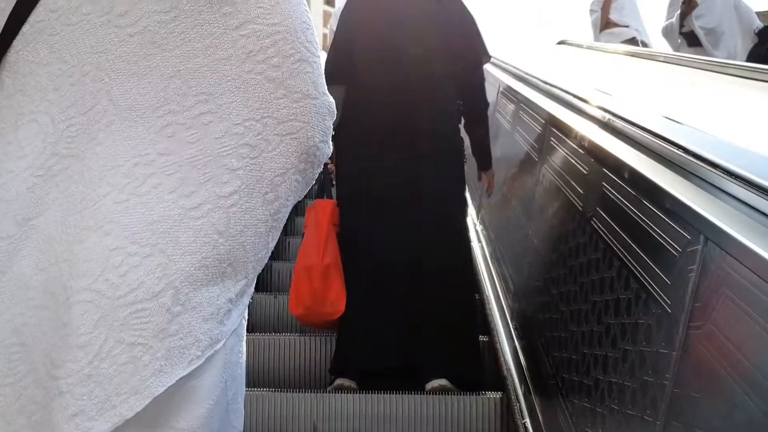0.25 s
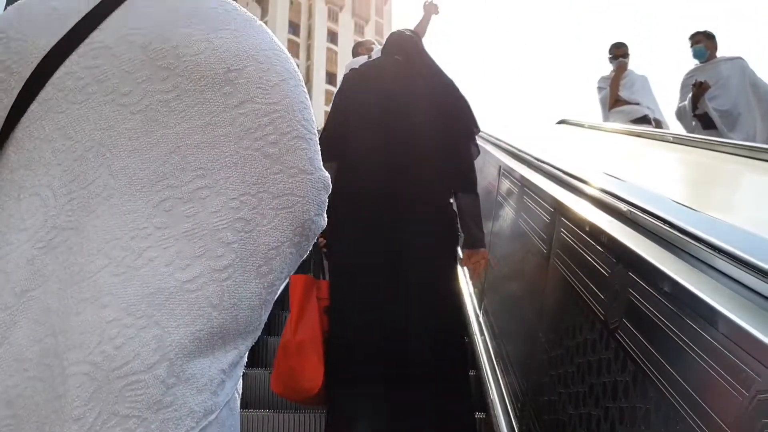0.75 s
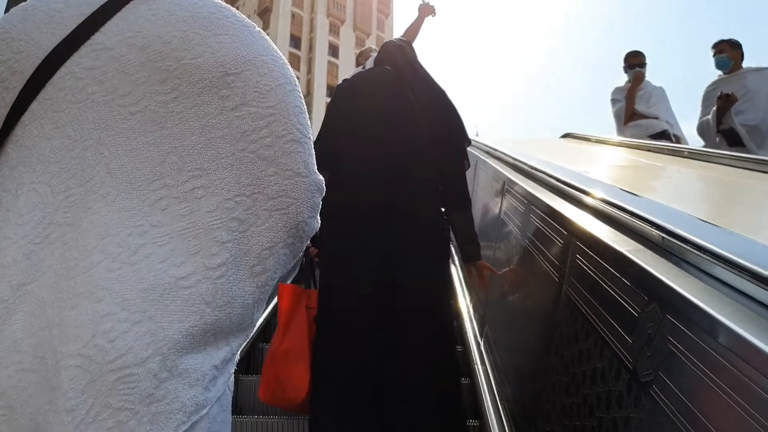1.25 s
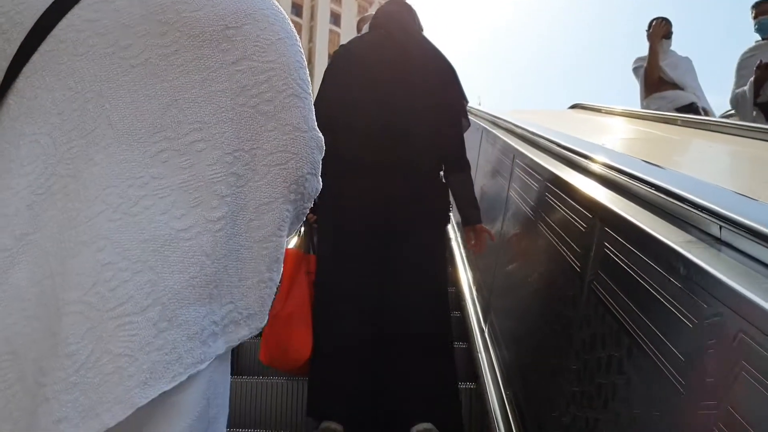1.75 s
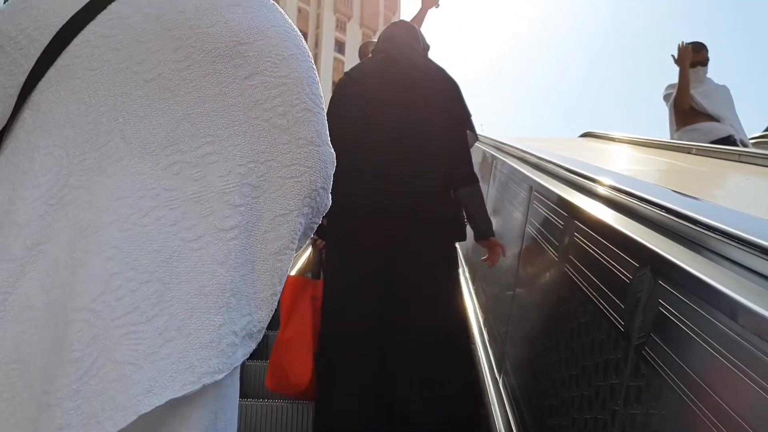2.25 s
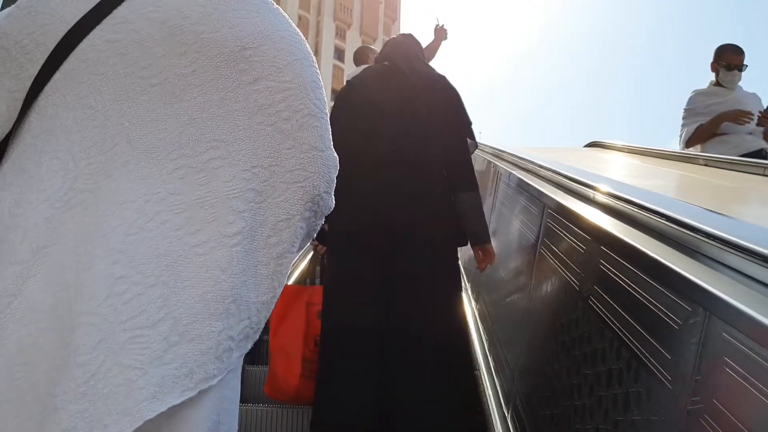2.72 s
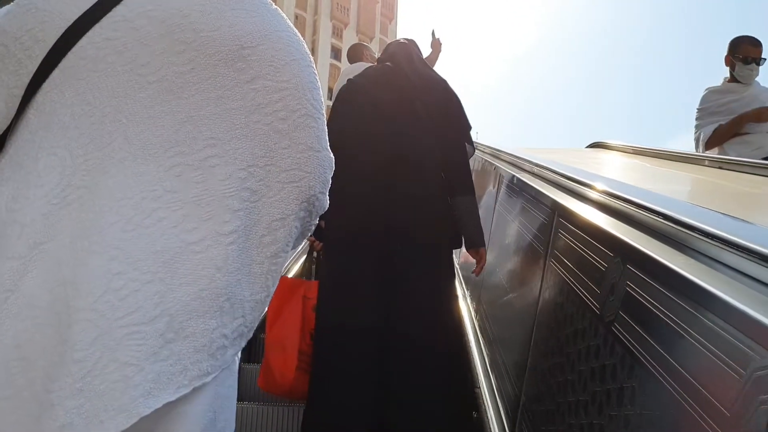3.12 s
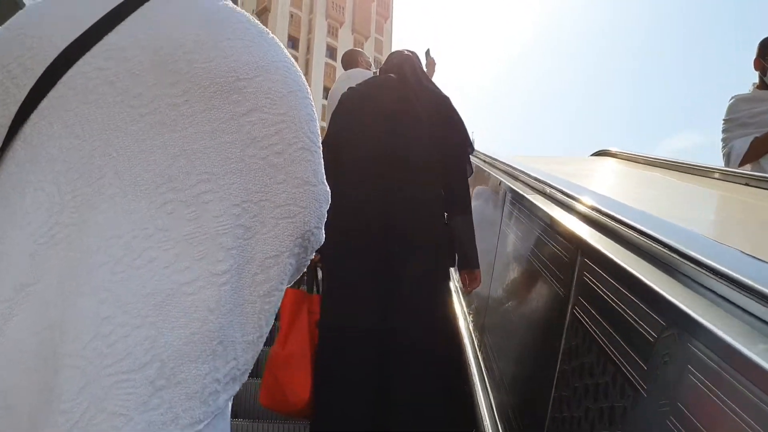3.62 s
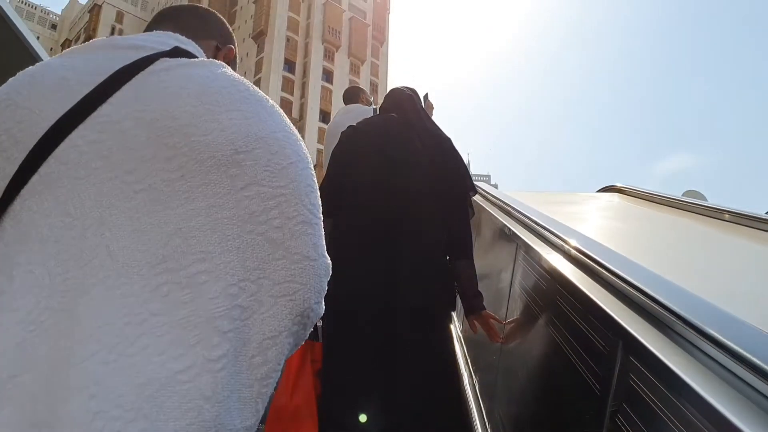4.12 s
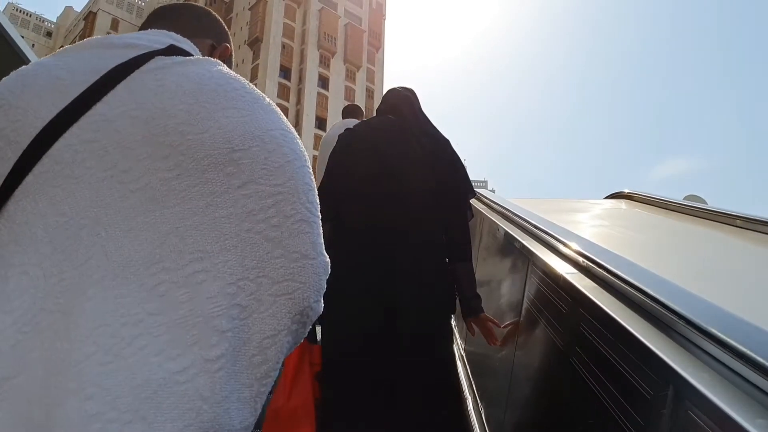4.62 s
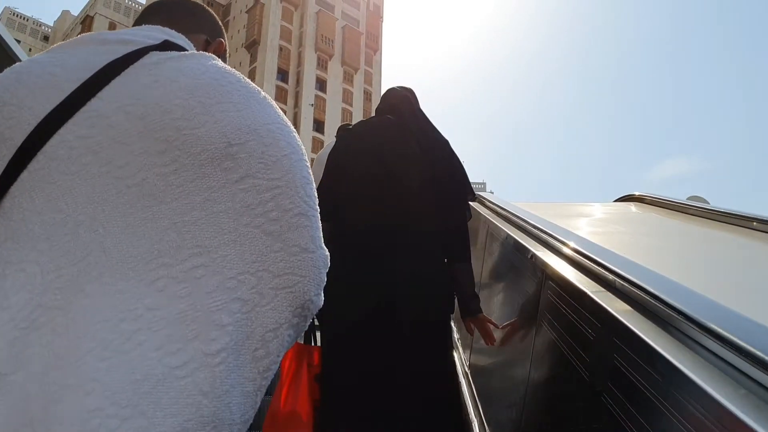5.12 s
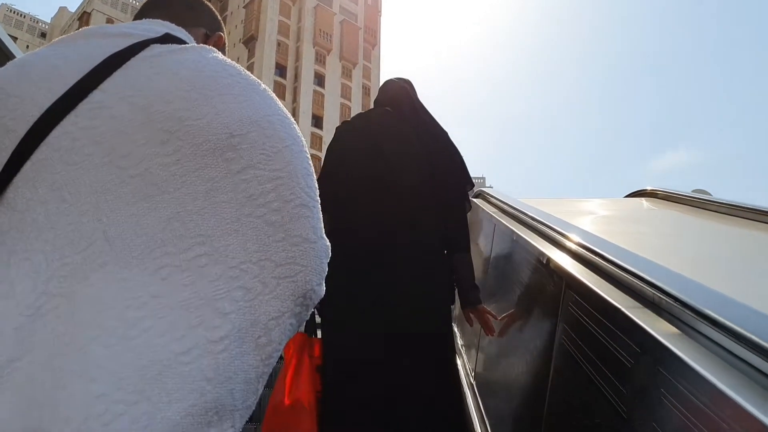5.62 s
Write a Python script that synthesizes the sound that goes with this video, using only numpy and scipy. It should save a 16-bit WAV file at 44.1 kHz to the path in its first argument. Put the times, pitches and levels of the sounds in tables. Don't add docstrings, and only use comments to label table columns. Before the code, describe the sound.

Riding an outdoor escalator: steady, bass-heavy roller rumble with narrow metallic hum, faint drive whine and brushing hiss. A low engine drone swells until about two seconds, then thins. A sharp click lands past the middle, followed by thin fluttering brake squeals on the right. Hand-held stereo microphone, wide and diffuse.

```python
import sys
import numpy as np
from scipy import signal
from scipy.fft import rfft, irfft
from scipy.io import wavfile
from scipy.ndimage import uniform_filter1d

SR = 44100
rng = np.random.default_rng(int(sys.argv[2]) if len(sys.argv) > 2 else 0)


def log_audio(samples):
    frames = np.atleast_2d(samples).T
    limited = np.clip(frames, -1, 1)
    pcm = np.round(limited * 32767).astype(np.int16)
    wavfile.write(sys.argv[1], SR, pcm)


def undo_db(level):
    steps = np.asarray(level, float) / 20
    return 10 ** steps


N = 258426
TIME = np.arange(N) / SR

PORT_GAP_M, SOUND_M_S = 0.18, 343
# frequency in Hz, left minus right port in dB.
BODY_SHADE = [(60, -1), (200, 0), (380, -2.5), (700, -0.5), (1290, -2.5), (2400, -6), (3600, -8),
              (5000, -7.5), (6800, -21.5), (9000, -6.5), (13000, -11)]
# frequency in Hz, density in dB per Hz.
ROLLING_COLOUR = [(20, -5.5), (32, -4.5), (90, -1), (145, -10), (300, -11.5), (500, -15.5), (950, -24),
                  (2000, -27.5), (3200, -33), (4600, -40.5), (7300, -41), (8400, -51), (11000, -44.5),
                  (15400, -48)]
# frequency in
# Hz, width in Hz, level over the colour in dB.
HUMPS = [(766, 220, 3), (1275, 240, 1.5), (1650, 100, -0.5), (2146, 110, 2), (2780, 560, 2)]
# time in seconds, level in dB.
RIDE = [(0, 4), (.33, 2.5), (.35, 0.5), (1.1, 1), (1.5, 0), (1.9, 1), (2.28, 0), (2.33, -2.5), (2.7, -3),
        (3.1, -2), (4.3, 0.5), (5.3, 1), (5.86, 1.5)]
TRUSS_SHARE, ROLLING_SHARE, SCRAPING_SHARE, HISS_SHARE = 0.16, 0.91, 1, 0.25
# middle in seconds, length in seconds, rise in dB.
BRUSHING = [
    (.15, .4, -1),
    (1.2, 1, 8),
    (2.9, 1.0, 4),
    (4.5, 0.58, 3.5),
    (5.1, 0.85, 7.5),
    (5.8, .6, 5),
]
BRUSH_HISS_SHARE = 0.27

# frequency in Hz, width in Hz, level in dB.
TRUSS_MODES = [(166.7, 2.5, -29.5), (217.6, 15, -31.5), (333, 7.5, -32), (355.7, 48, -28), (363.5, 10, -28),
               (388.3, 12, -37), (437.8, 6.2, -38.5), (578, 31, -36)]
# time in seconds, level in dB.
TRUSS_DRIVE = [(0, -31), (.3, -28), (.9, -25), (1.5, -22), (2.3, -23.5), (2.34, -31), (3.12, -29.5),
               (3.17, -24), (4.9, -23.5), (5.86, -25.5)]

# time in seconds, firing rate in Hz, level in dB, neighbouring crank orders in dB.
ENGINE = [(0, 68.4, -27, -3), (.45, 67.3, -27, -10), (.55, 67.1, -17.5, -4), (.72, 64.97, -17.5, -4),
          (1.66, 64.9, -17, -8), (1.74, 65.1, -12.5, -9), (2.31, 65.34, -7.5, -5), (2.43, 65.2, -13, -9),
          (2.9, 64.5, -13.5, -15), (3.05, 65.26, -30, -9), (4.03, 66.34, -41, -12), (4.13, 66.3, -13, -7),
          (4.68, 66.5, -10, -1), (4.9, 65.6, -14.5, -6), (5.0, 66.17, -30, -8), (5.86, 65, -28, -8)]
# multiple of the firing rate, level in dB.
CRANK_ORDERS = [(.5, -12), (0.751, -10), (1.25, -5.5), (1.5, -12)]
# middle in seconds, length in seconds, level in dB.
LOPES = [
    (3.1, 0.094, -22),
    (3.38, .16, -19.5),
    (3.64, .1, -13.5),
    (3.76, 0.1, -21),
    (3.875, 0.08, -15),
    (3.97, 0.085, -13),
    (5.5, 0.19, -29),
    (5.85, .1, -25),
]
THROB_HZ, THROB_PEAK_S, THROB_DB = 9.37, 0.93, -23.5

# time in seconds, level in dB, upper orders in dB.
MESH = [(0, -39, 7), (.33, -29, -5), (.37, -36, -8), (1.2, -38, 2.5), (1.7, -34.5, -3), (2.1, -31, -5),
        (2.5, -33.5, -5), (4.5, -42, -4.5), (5.86, -39, -1)]
# multiple of the mesh rate, level in dB.
MESH_ORDERS = [(1, 0.5), (2, 2.5), (4, -13), (5, 2.5), (6, -16), (7, -13), (8, -20), (10, -10), (12, -19)]
MESH_HZ = 236.9

# frequency in Hz, width in Hz, level in dB.
OPENING_BANDS = [(470, 27, -30.5), (1210, 68, -37), (1410, 250, -34), (1650, 70, -36), (2360, 71, -44),
                 (2894, 54, -39.5), (3400, 600, -41.5), (3880, 250, -45), (6400, 130, -50)]
OPENING_END_S, OPENING_FADE_S = 0.345, 0.01
# middle in seconds, length in seconds, frequency in Hz, width in Hz, level in dB.
PANELS = [(0.058, 0.082, 490, 27, -22), (2.15, 0.33, 241, 19, -23), (2.048, 0.61, 1280, 220, -38),
          (2.905, 0.34, 1230, 147, -36), (2.1, .35, 180, 40, -22.5), (5.75, 0.51, 82.6, 6, -24.5),
          (5.52, .08, 1440, 80, -30), (4.955, 1.37, 2190, 220, -38.5), (5.12, 0.22, 96, 9.2, -21),
          (1.32, 0.64, 14800, 1500, -52), (3.7, .9, 438, 4.2, -32), (3.55, .8, 333, 7.8, -29.5),
          (4.83, 0.93, 335, 9.2, -28), (1.78, 0.37, 85, 8.3, -18), (1.88, 0.46, 560, 120, -30.5)]

# start in seconds, peak in dB, left minus right in dB, low modes in dB.
TICKS = [
    (.5201, -18, -9, -20),
    (3.5618, -4, -13, 0),
]
# frequency in Hz, level in dB.
TICK_MODES = [(2850, 4), (4300, -2), (7000, 6), (9000, -8), (11000, -4), (13200, -5), (15000, -8)]

# middle in seconds, length in seconds, level in dB.
SQUEAL_HIGH = [(4.09, 0.12, -48), (4.19, .11, -36), (4.285, 0.073, -34), (4.355, 0.081, -39),
               (4.415, 0.056, -38), (4.5, 0.083, -38), (4.55, 0.063, -39), (4.62, .09, -34),
               (4.705, 0.085, -29.5), (4.77, 0.035, -39), (4.82, .075, -35.5), (4.865, 0.026, -40),
               (4.935, 0.091, -33), (5.015, 0.066, -34), (5.11, 0.17, -37.5), (5.21, 0.046, -36),
               (5.32, .2, -47), (4.75, 1.6, -55)]
# middle in seconds, length in seconds, level in dB.
SQUEAL_LOW = [(4.54, 0.077, -45), (4.66, .14, -39), (4.76, .05, -42), (4.88, 0.22, -40.5),
              (4.99, 0.039, -43), (5.07, 0.093, -45), (5.19, .07, -45), (5.25, 0.034, -42),
              (5.3, 0.055, -47), (5.45, .17, -44), (5.56, 0.082, -42), (5.73, 0.092, -45), (5.84, .06, -47),
              (5.15, 1.5, -59)]
# middle in seconds, length in seconds, level in dB.
SQUEAL_LATE = [
    (5.585, 0.15, -45),
    (5.72, .2, -39),
    (5.73, 0.082, -39),
    (5.84, 0.16, -45),
]
# middle in seconds, length in seconds, level in dB.
SQUEAL_FAINT = [
    (1.0, 0.57, -51),
    (1.3, 0.13, -55),
    (1.5, 0.32, -54),
]
# middle in seconds, length in seconds, level in dB.
SQUEAL_MID = [
    (2.01, .07, -39),
    (2.1, .065, -38),
    (2.22, 0.073, -41),
    (2.3, 0.057, -46),
    (2.4, .07, -44),
    (2.49, 0.054, -48),
    (2.57, .06, -47),
]
HIGH_HZ, HIGH_CREEP_HZ_S = 6749, 38
LOW_HZ, LOW_CREEP_HZ_S = 3918, 34
LATE_HZ, LATE_CREEP_HZ_S = 4222, -40
FAINT_HZ, MID_HZ = 10570, 3137
GRIP_ROUNDNESS = 0.77


def curves(rows):
    seconds, *columns = np.transpose(rows)
    return [np.interp(TIME, seconds, column) for column in columns]


def on_log(points, hz):
    point_hz, db = np.transpose(points)[:2]
    return np.interp(np.log(hz + 1), np.log(point_hz), db)


def unit(x):
    return x / np.sqrt(np.mean(x ** 2))


def walk(rate):
    hold = int(SR / rate)
    steps = np.repeat(rng.standard_normal(N // hold + 1), hold)
    slewed = uniform_filter1d(uniform_filter1d(steps, hold), hold)
    return unit(slewed[:N])


def swells(rows):
    total = 0
    for middle, length, height in rows:
        phase = np.pi * np.clip((TIME - middle) / length, -0.5, 0.5)
        total = total + height * np.cos(phase).clip(0) ** GRIP_ROUNDNESS
    return total


def gains(rows):
    return swells([(middle, length, undo_db(db)) for middle, length, db in rows])


def panned(tone, pan_db):
    lean = undo_db(np.array([[pan_db], [-pan_db]]) / 2)
    return tone * lean / lean.mean()


def diffuse(hz, gain):
    alike = np.sinc(2 * hz * PORT_GAP_M / SOUND_M_S)
    alike = 1 - (1 - alike) * (1 - 0.43 / (1 + (hz / 350) ** 2))
    mid, side = rfft(rng.standard_normal((2, N)))
    common = mid * np.sqrt(1 + alike)
    apart = side * np.sqrt(1 - alike)
    pair = np.array([common + apart, common - apart])
    lean = undo_db(np.outer([0.5, -0.5], on_log(BODY_SHADE, hz)))
    mid_power = lean[0] ** 2 + lean[1] ** 2 + 2 * alike
    return irfft(pair * lean * gain / np.sqrt(mid_power), N)


def leveled(pair, db):
    return pair / np.sqrt(np.mean(pair.mean(axis=0) ** 2)) * undo_db(db)


def resonance(hz, centre, width, db):
    return leveled(diffuse(hz, 1 / (1 + (2 * (hz - centre) / width) ** 2)), db)


def rumble(hz):
    ride, = curves(RIDE)
    hiss = HISS_SHARE * ride + BRUSH_HISS_SHARE * swells(BRUSHING) - 1.2 + 0.69 * walk(9)
    still = 0 * TIME
    levels = np.array([still, TRUSS_SHARE * ride, ROLLING_SHARE * ride, SCRAPING_SHARE * ride, hiss, still])
    layer_hz = [60, 300, 1400, 3000, 9000]
    humps_db = sum(db / (1 + (2 * (hz - f) / width) ** 2) for f, width, db in HUMPS)
    colour = undo_db(on_log(ROLLING_COLOUR, hz) + humps_db)
    swell = walk(2.62)
    out = 0
    for centre in 24 * 2.0 ** np.arange(10):
        octaves_off = np.clip(np.log2((hz + 1) / centre), -1, 1)
        share = np.cos(np.pi / 2 * octaves_off)
        place = np.interp(np.log2(centre), np.log2(layer_hz), np.arange(5))
        k = int(place)
        level_db = levels[k] + (place - k) * (levels[k + 1] - levels[k])
        flicker = 0.5 * walk(16) + 0.5 * walk(8)
        out = out + diffuse(hz, colour * share) * undo_db(level_db + 0.44 * swell + flicker)
    return leveled(out, -17.5)


def truss(hz):
    drive, = curves(TRUSS_DRIVE)
    rings = 0
    for f, width, db in TRUSS_MODES:
        rings = rings + resonance(hz, f, width, db - 2.5)
        if width < 11:
            tone = np.sin(2 * np.pi * f * TIME + 1.19 * walk(width))
            rings = rings + undo_db(db + 1.9 * walk(5.06)) * tone
    return rings * undo_db(0.73 * (drive - drive.mean()) + 0.96 * walk(7))


def panels(hz):
    def ring(f, width, db):
        return resonance(hz, f, width, db + 2.0 * walk(11))

    opening = sum(ring(*mode) for mode in OPENING_BANDS)
    out = opening * np.clip((OPENING_END_S - TIME) / OPENING_FADE_S, 0, 1)
    for middle, length, f, width, db in PANELS:
        out = out + ring(f, width, db) * swells([(middle, length, 1)])
    return out


def engine():
    hz, db, orders_db = curves(ENGINE)
    turn = 2 * np.pi * np.cumsum(hz) / SR
    throb_depth = np.minimum(undo_db(THROB_DB), 0.85 * undo_db(db))
    throb = throb_depth * np.cos(2 * np.pi * THROB_HZ * (TIME - THROB_PEAK_S) + 0.5 * walk(2))
    orders = sum(undo_db(d + 2.96 * walk(5)) * np.sin(k * turn + 0.69 * walk(4)) for k, d in CRANK_ORDERS)
    strength = (undo_db(db) + throb + gains(LOPES)) * undo_db(0.29 * walk(27))
    firing = strength * np.sin(turn + 0.2 * walk(7.4))
    tone = np.sqrt(2) * (firing + undo_db(orders_db - 16.0) * orders)
    return tone * undo_db(np.array([[-0.3], [0.3]]))


def gears():
    db, upper_db = curves(MESH)
    lag = np.array([[0], [PORT_GAP_M / SOUND_M_S]])
    whine = 0
    for k, order_db in MESH_ORDERS:
        level = np.sqrt(2) * undo_db(order_db + upper_db * (k > 3) + 2.4 * walk(8))
        whine = whine + level * np.sin(2 * np.pi * k * MESH_HZ * (TIME + lag) + 1.29 * walk(20))
    return undo_db(db) * whine


def rattle(hz):
    db = swells(BRUSHING)
    chance = rng.random((2, N))
    struck = chance[0] < 250 / SR
    clicks = struck * undo_db(-3.0 * np.log(chance[1] + 0.03)) * rng.choice([-1, 1], N)
    ring = unit(irfft(rfft(clicks) / (1 + 1j * (hz - 7300) / 450), N))
    return ring * undo_db(1.2 * (db - db.mean()) - 54.5 + np.array([[-5], [3]]))


def ticks():
    out, t = np.zeros((2, N)), TIME[:1500]
    for start, db, pan_db, low_db in TICKS:
        snap = 0
        for f, mode_db in TICK_MODES:
            burst = np.exp(-((t - 0.0011 - f * 3.5e-8) / 0.00031) ** 2)
            snap = snap + undo_db(mode_db + low_db * (f < 10500)) * burst * np.sin(2 * np.pi * f * t)
        snap = snap / np.abs(snap).max() * undo_db(db - 3.0)
        wall = rng.standard_normal(len(t)) * np.exp(-np.abs(t - 0.007) / 0.0028) / 3
        snap = snap + undo_db(-18) * np.convolve(snap, wall)[:len(t)]
        i = int(start * SR)
        out[:, i:i + len(t)] += panned(snap, pan_db)
    return out


def squeal(rows, hz, creep, pan_db, waver=0.51):
    flutter_db = 1.0 * walk(30)
    turn = 2 * np.pi * np.cumsum(hz + creep * (TIME - rows[0][0])) / SR
    tone = np.sqrt(2) * gains(rows) * undo_db(flutter_db) * np.sin(turn + waver * walk(40))
    return panned(tone, pan_db)


def scene():
    hz = np.arange(N // 2 + 1) * SR / N
    machinery = rumble(hz) + truss(hz) + panels(hz) + engine() + gears() + rattle(hz)
    whistles = squeal(SQUEAL_FAINT, FAINT_HZ, 0, -15, waver=3.5) + squeal(SQUEAL_MID, MID_HZ, 0, -9, waver=0.9)
    brakes = (squeal(SQUEAL_HIGH, HIGH_HZ, HIGH_CREEP_HZ_S, -19)
              + squeal(SQUEAL_LOW, LOW_HZ, LOW_CREEP_HZ_S, -18.5)
              + squeal(SQUEAL_LATE, LATE_HZ, LATE_CREEP_HZ_S, -21))
    return machinery + ticks() + whistles + brakes


def roll_off(x):
    return signal.sosfilt(signal.butter(12, 16470, fs=SR, output="sos"), x)


def record(dry):
    rounded = np.tanh(0.69 * dry) / 0.71 * 1.053
    top_cut = signal.ellip(10, 0.2, 52, 15500, fs=SR, output="sos")
    mix = signal.sosfilt(top_cut, rounded)
    return roll_off(mix)


dry = scene()
out = record(dry)
log_audio(out)
```